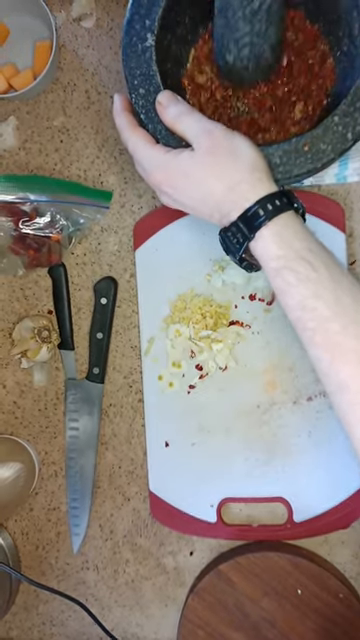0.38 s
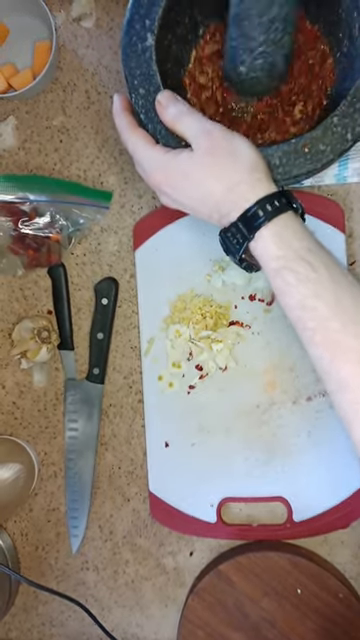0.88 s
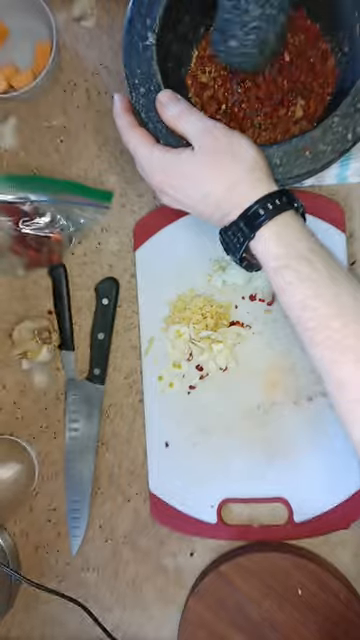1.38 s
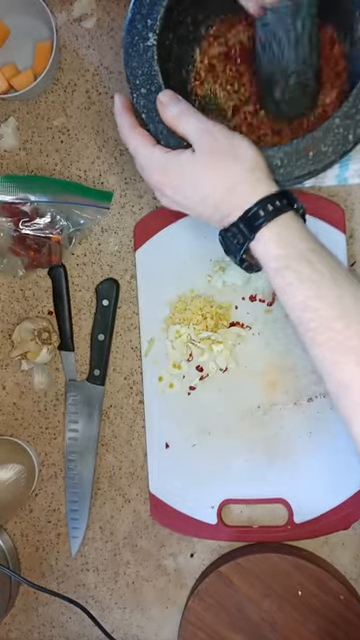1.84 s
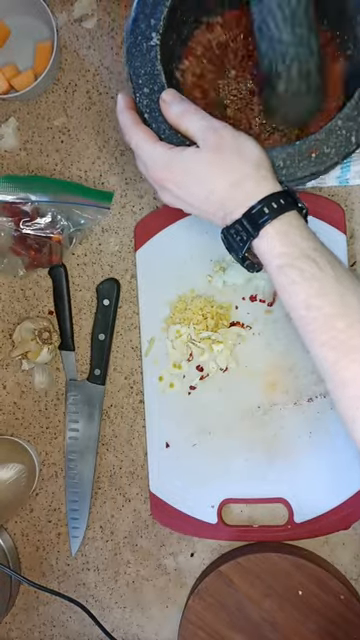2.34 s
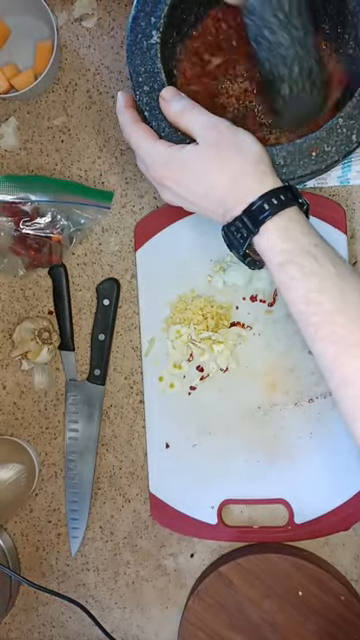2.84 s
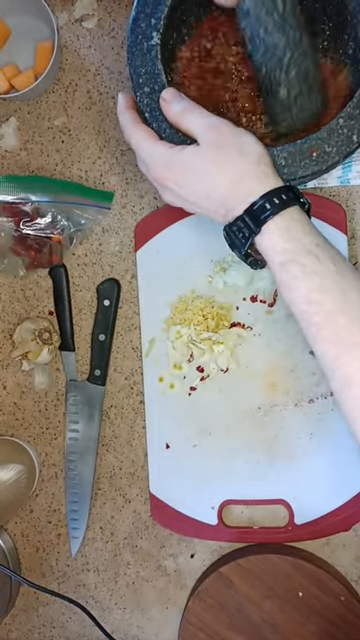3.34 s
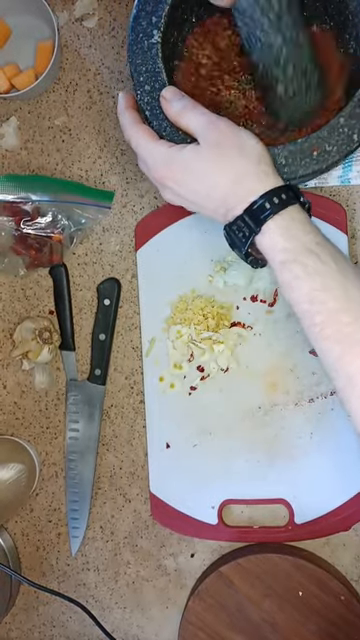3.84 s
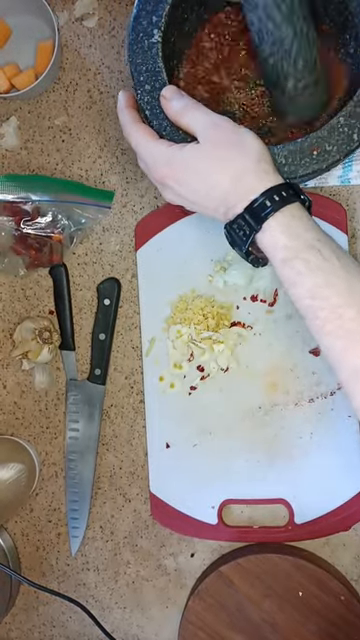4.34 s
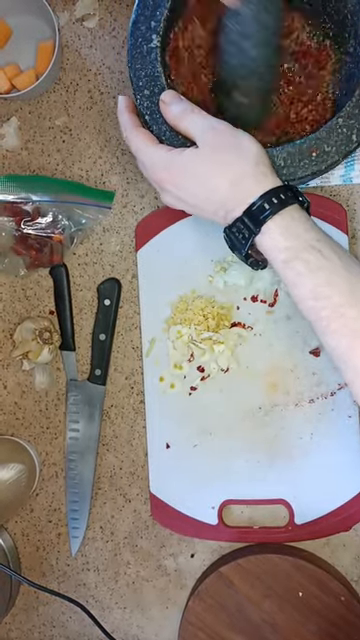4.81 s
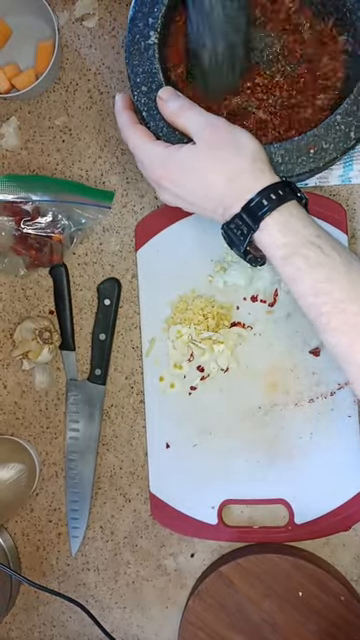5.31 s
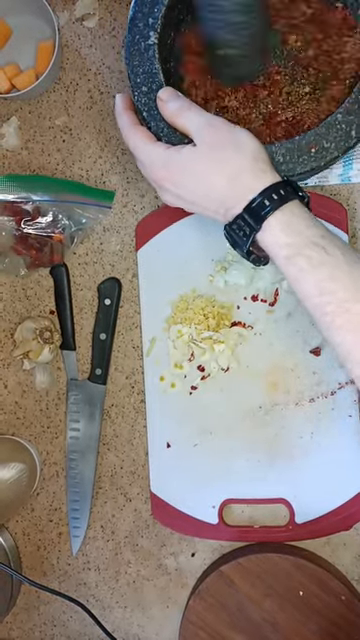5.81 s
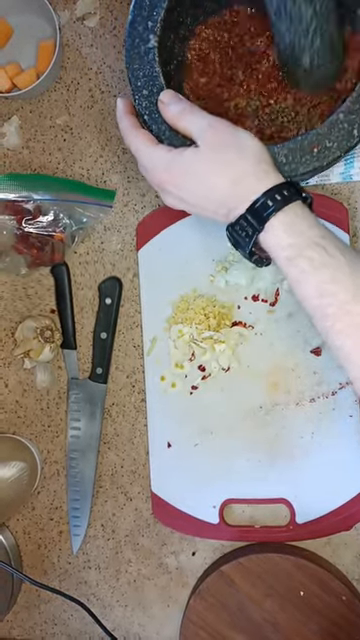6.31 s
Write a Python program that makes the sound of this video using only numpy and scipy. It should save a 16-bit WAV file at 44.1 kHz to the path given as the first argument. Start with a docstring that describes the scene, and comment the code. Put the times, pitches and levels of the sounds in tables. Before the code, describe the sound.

Close by, heavy stone knocks on stone through a layer of brittle spice, eight evenly spaced blows that shake the counter and leave short rough tails. Then the pestle rolls round the bowl, crunching in irregular pushes with dry scrapes, seed pops, light stone ticks and a thin occasional squeak, far softer than the pounding. Small indoor room, quiet hum and hiss.

```python
"""A stone pestle pounds dry spices in a stone mortar: eight quick blows after one still dying away, then it
turns and grinds. Blows are short pushes that ring mortar modes, swing the counter and raise a noise rumble.
Crushed spice is bursts of grit; knocks and rubs excite resonances of the bowl. Grinding is crackle, scrape,
shake and squeak under envelopes of weight and wrist pushes. The kitchen hums quietly under a faint hiss."""
import sys
import numpy as np
from scipy import signal
from scipy.fft import rfft, irfft, next_fast_len
from scipy.io import wavfile
from scipy.ndimage import uniform_filter1d

SR = 44100
rng = np.random.default_rng(int(sys.argv[2]) if len(sys.argv) > 2 else 0)


def natural_amplitude(level_db):
    """Convert a level in decibels to a linear amplitude factor, elementwise."""
    exponent = np.asarray(level_db, float) / 20
    return 10 ** exponent


def inscribe(sig):
    """Save sig as 16-bit PCM at rate SR to the path in sys.argv[1].

    A 1-D sig is mono; a 2-D sig holds one channel per row.
    Samples are clipped to [-1, 1] before scaling.
    """
    pcm = np.round(np.clip(np.atleast_2d(sig).T, -1, 1) * 32767)
    wavfile.write(sys.argv[1], SR, pcm.astype(np.int16))


N = 283563
LEAD = 4410  # samples computed ahead of time 0
STFT = dict(fs=SR, nperseg=512, noverlap=384)


def evened(x):
    """Scales to rms 1."""
    return x / np.sqrt(np.mean(x ** 2) + 1e-20)


def read(points, hz):
    """Reads a table along log frequency."""
    point_hz, value = np.transpose(points)
    return np.interp(np.log(hz + 1), np.log(point_hz + 1), value)


def add(mix, start_s, sound):
    """Mixes a sound into a track that starts LEAD samples early."""
    part = mix[LEAD + round(start_s * SR):][:len(sound)]
    part += sound[:len(part)]


def colour(x, db_at):
    """Filters x by a gain in dB given as a function of frequency; rms 1."""
    size = next_fast_len(len(x))
    gain = natural_amplitude(db_at(np.fft.rfftfreq(size, 1 / SR) + 1))
    return evened(irfft(rfft(x, size) * gain, size)[:len(x)])


def ring(modes, seconds, factor=1):
    """Sum of dying sines, all frequencies scaled by factor."""
    t = np.arange(round(seconds * SR)) / SR
    return sum(natural_amplitude(db - 60 * t / max(t60_s, .005)) * np.sin(2 * np.pi * hz * factor * t)
               for hz, db, t60_s in modes)


def grit(size, share, spread_db):
    """Dense crackle: noise in which a share of samples snap, sizes spread widely."""
    snap = rng.random(size) < share
    sizes = rng.exponential(1, size)
    noise = rng.standard_normal(size)
    return noise * (1 + snap * natural_amplitude(spread_db * np.minimum(sizes, 2.5)))


def smooth_noise(size, span):
    """Noise averaged once over span samples; rms 1."""
    return evened(uniform_filter1d(rng.standard_normal(size), span))


def wander(size, span):
    """Noise averaged twice over span samples, for slow pitch drift; rms 1."""
    return evened(uniform_filter1d(uniform_filter1d(rng.standard_normal(size), span), span))


def slip_noise(size, spread_db, width_hz):
    """Stick-slip modulator: grit low-passed so that it spreads a tone over width_hz; rms 1."""
    return colour(grit(size, .03, spread_db), lambda f: -10 * np.log10(1 + (2 * f / width_hz) ** 4))


# hum colour: freq_hz, gain_db
HUM_COLOUR = [(59, -39), (100, -1), (134, -7.5), (291, 3), (412, -3.5), (490, -17.5), (597, 0.5),
              (788, -10), (896, -15.5), (1310, -5.5), (1600, -21), (2080, -53), (3520, -120)]
HUM_DB, HISS_DB, HISS_DB_PER_OCTAVE = -64, -76.5, -4  # hiss falls above 1.5 kHz


def kitchen():
    """Room hum and faint hiss: two steady coloured noises."""
    hum = colour(rng.standard_normal(N + LEAD), lambda f: read(HUM_COLOUR, f))
    hiss = colour(rng.standard_normal(N + LEAD), lambda f: HISS_DB_PER_OCTAVE * np.log2(np.maximum(f, 1500)))
    return natural_amplitude(HUM_DB) * hum + natural_amplitude(HISS_DB) * hiss


# rumble returned by counter and room: freq_hz, gain_db
RUMBLE_COLOUR = [(62, 1), (105, -7), (203, -4.5), (262, -4), (300, -6), (349, 1), (387, -9.5), (632, 1.5),
                 (1090, -8), (1350, -9), (1520, -12.5), (2750, -25), (6000, -52), (7800, -86),
                 (13200, -120)]
# rumble decay: freq_hz, t60_s
RUMBLE_DECAY = [(150, 0.42), (400, 0.32), (1040, 0.32), (2760, 0.34)]
# resonances standing out of the rumble: freq_hz, width_hz, gain_db
RUMBLE_LINES = [(281, 23, 5), (333, 110, 0), (440, 29, 11.5), (930, 44, 7), (890, 28, 5.5), (1190, 29, -1),
                (1190, 64, 5.5), (1347, 20, 12), (1376, 25, 0)]
RUMBLE_TILT_DB_PER_OCTAVE = .2  # above 200 Hz


def rumble(shared):
    """Gritty tail dying band by band; its bass partly repeats between blows, its upper part is new."""
    hz, t, same = signal.stft(shared, **STFT)
    fresh = signal.stft(evened(grit(len(shared), .012, 4.5)), **STFT)[2]
    alike = np.clip(.75 - hz / 2500, 0, 1)[:, None]
    blend = alike * same + np.sqrt(1 - alike ** 2) * fresh
    fade_db = -60 * np.maximum(t - .04, 0) / read(RUMBLE_DECAY, hz)[:, None]  # holds, then decays
    tail = signal.istft(blend * natural_amplitude(fade_db), **STFT)[1]

    def gain_db(f):
        lines_db = sum(db / (1 + (2 * (f - at_hz) / width_hz) ** 2) for at_hz, width_hz, db in RUMBLE_LINES)
        tilt_db = RUMBLE_TILT_DB_PER_OCTAVE * np.log2(np.maximum(f, 200) / 650)
        return read(RUMBLE_COLOUR, f) + lines_db + tilt_db

    tail = colour(tail, gain_db)
    t = np.arange(len(tail)) / SR
    arrival = np.clip((t - .002) / .015, 0, 1)  # reflections build up
    rocking = natural_amplitude(3 * np.cos(2 * np.pi * 42 * (t - .018)) * np.exp(-t / .1))  # mortar rocks with the counter
    closing = np.clip((t[-1] - t) / .44, 0, 1)
    return tail * arrival * rocking * closing


# blows: start_s, ring_db, shake_db, rumble_db, crush_db (crush is played by cracking)
BLOW_TABLE = [(-.06, -9, -33, -39.5, -40), (.1772, -9.2, -33, -40, -37), (.4142, -9.5, -34.3, -38, -37),
              (.6474, -9, -37.5, -37.5, -41.5), (.8852, -9.4, -37.5, -38.5, -39),
              (1.1134, -15, -32.5, -38, -33.5), (1.3712, -9, -34, -38.5, -35.5),
              (1.6041, -9.1, -35.3, -38.5, -33), (1.8389, -9.4, -32.2, -40.5, -32)]
# mortar modes: freq_hz, level_db, t60_s
MORTAR_MODES = [(436, -10, .026), (619, 0, .048), (678, -4, .024), (927, -22, .04), (1250, -21, .016),
                (1900, -21, .012), (2700, -16, .01)]
# counter and what stands on it, starting one after another: freq_hz, level_db, t60_s, delay_s
COUNTER_MODES = [(16.9, -11, 1, .104), (24.5, 11, 0.25, .048), (41.5, 14, 0.18, 0.0031),
                 (60.8, 2, 0.25, 0.012), (88.4, 0.5, 0.3, 0.0083), (152.6, -3.5, 0.32, 0.0023)]
FULL_RING_DB, FLAT_PER_DB = -9, .008  # a blow cushioned by spice rings weaker and lower
CONTACT_S, SOFTER_S_PER_DB = .00122, .0001  # and the stones stay longer in contact
REBOUND_S, REBOUND_DB = .0425, -17  # mortar lands again on the rocking counter


def pounding():
    """A millisecond push rings the mortar; the counter rocks under it; the room rumbles after."""
    mix = np.zeros(N + LEAD)
    shared = rng.standard_normal(SR // 2)
    for start_s, ring_db, shake_db, rumble_db, _ in BLOW_TABLE:
        cushion_db = FULL_RING_DB - ring_db
        contact = round(SR * (CONTACT_S + SOFTER_S_PER_DB * cushion_db))
        jolt = np.gradient(signal.windows.hann(contact))  # the air feels the change of the force
        knell = np.convolve(ring(MORTAR_MODES, .1, 1 - FLAT_PER_DB * cushion_db), jolt)
        knell = knell / abs(knell).max()
        add(mix, start_s, natural_amplitude(ring_db) * knell)
        add(mix, start_s + REBOUND_S, natural_amplitude(ring_db + REBOUND_DB) * knell)
        for hz, db, t60_s, delay_s in COUNTER_MODES:
            t = np.arange(round(.6 * SR)) / SR
            swell = 1 - np.exp(-t * hz / .6)  # builds up over a cycle
            swing = -swell * ring([(hz, db, t60_s)], .6)  # first swing downward
            add(mix, start_s + delay_s, natural_amplitude(shake_db) * swing)
        add(mix, start_s, natural_amplitude(rumble_db) * rumble(shared))
    return mix


# crushed spice: freq_hz, gain_db
CRUNCH_COLOUR = [(1470, -9.5), (2500, -12.5), (3340, -7), (4200, -6.5), (5180, -4.5), (5760, -4.5),
                 (8130, -2.5), (9930, -8), (13200, -4), (15600, -15)]


def crunch_db_at(hz):
    """Colour of crushed spice, falling away steeply in the bass."""
    return read(CRUNCH_COLOUR, hz) + 12 * np.log2(np.minimum(hz / 1500, 1))


# single seeds and pods bursting: start_s, level_db, t60_s, tilt_db_per_octave
SEED_CRACKS = [(0.705, -23, 0.22, -2.5), (1.2547, -34, 0.055, 14), (1.288, -41, .03, 2),
               (1.529, -33.5, 0.37, -1), (1.584, -41, 0.13, -5), (1.903, -27, 0.13, -6),
               (1.971, -44, .25, -3), (2.7955, -38, .05, 0), (3.0225, -32, .05, 1), (3.062, -40, 0.25, 6),
               (4.008, -36, .03, 14), (4.1767, -37, 0.36, -2), (4.7082, -28, .06, 8), (4.955, -25, 0.11, 4),
               (6.0247, -34, 0.088, -3), (5.47, -32, 0.46, -5)]
# pestle skids on after each blow: start_s, knock_db, knock_hz, scatter_db (knock is played by knocks)
SKID_TABLE = [(0.189, -33.5, 2080, -41.5), (0.4232, -25, 2100, -42), (0.663, -54, 2400, -46.5),
              (0.898, -43, 2500, -45.5), (1.1249, -26.5, 2270, -39), (1.383, -32.5, 2520, -41),
              (1.6148, -33.5, 2260, -42.5), (1.8495, -27.5, 2080, -38.5)]
BURST_DB = -19  # added to every burst level
# spice gives way just before stone meets stone
CRUSH_LEAD_S, CRUSH_SNAP_DB, CRUSH_T60_S, CRUSH_TILT_DB_PER_OCTAVE = .0035, 6, .09, -8
SCATTER_HOLD_S, SCATTER_T60_S, SCATTER_TILT_DB_PER_OCTAVE = .028, .29, .5


def cracking():
    """Crushed, scattering and bursting spice: grit that starts at once, comes in clumps and thins out."""
    mix = np.zeros(N + LEAD)
    t = np.arange(SR // 3) / SR
    crushes = [(start_s - CRUSH_LEAD_S, db + CRUSH_SNAP_DB, CRUSH_T60_S, CRUSH_TILT_DB_PER_OCTAVE, 0)
               for start_s, *_, db in BLOW_TABLE]
    scatters = [(start_s, db, SCATTER_T60_S, SCATTER_TILT_DB_PER_OCTAVE, SCATTER_HOLD_S)
                for start_s, *_, db in SKID_TABLE]
    cracks = [(*row, 0) for row in SEED_CRACKS]
    for start_s, db, t60_s, tilt_db, hold_s in crushes + scatters + cracks:
        burst = colour(grit(len(t), .074, 1.4),
                       lambda f: crunch_db_at(f) + tilt_db * np.log2(np.maximum(f, 2000) / 7000))
        clumps = natural_amplitude(1.4 * smooth_noise(len(t), 250))
        fade_db = -60 * np.maximum(t - hold_s, 0) / max(t60_s, .01)
        attack = np.minimum(t / .00094, 1)
        add(mix, start_s, natural_amplitude(db + BURST_DB + fade_db) * attack * clumps * burst)
    return mix


# pestle on bowl: start_s, peak_db, centre_hz, t60_s, tick_db (sharp tick on top, relative)
KNOCK_TABLE = [(1.26, -43, 2740, 0.055, -18), (1.277, -52, 3140, 0.16, -14), (1.26, -46, 1770, 0.058, -27),
               (2.124, -46, 1060, 0.091, -18), (2.6343, -49, 2470, 0.027, -18),
               (2.774, -47, 1010, 0.13, -22), (3.059, -49, 3150, .04, -20), (3.304, -48, 3300, .06, -20),
               (3.315, -48, 630, 0.048, -26), (3.3575, -42, 2920, 0.021, -22),
               (3.5625, -44.5, 2650, 0.025, -39), (3.997, -35, 2250, 0.013, -32),
               (4.0095, -35, 2260, 0.041, -32), (4.308, -31, 2590, 0.14, -3),
               (4.3113, -34, 1870, 0.17, -13), (4.524, -39, 1790, 0.16, -13.5),
               (4.6186, -48.5, 1730, 0.13, -20), (4.704, -43.5, 3230, 0.26, -14),
               (4.7185, -37, 2470, 0.026, -20), (4.954, -45, 2860, 0.073, -12),
               (5.39, -49, 633, 0.063, -26), (5.721, -39, 3020, 0.039, -5), (6.267, -43, 1600, 0.069, -20),
               (6.3463, -40.5, 2410, 0.12, -2)]
# bowl modes rung by a knock: freq_hz, level_db, t60_s
BOWL_MODES = [(1647, -8, .2), (1938, -6, .1), (2422, -4, .1), (2848, -8, .1), (3989, -2, .07),
              (4592, -3, .15), (5039, -3, .08), (5491, 0, .07), (6837, -3, .08)]
SKID_WIDTH_HZ, SKID_T60_S = 1130, .11
KNOCK_WIDTH = .2  # share of the centre frequency
TICK_HZ, TICK_WIDTH_HZ = 5100, 1200
FIRST_TOUCH, RING_PER_S = 9, .08  # first-contact click; longer contact rings the bowl more


def hump(f, centre_hz, width_hz):
    """Band-pass power response."""
    return 1 / (1 + (2 * (f - centre_hz) / width_hz) ** 4)


def knocks():
    """Each knock excites the bowl modes near its centre, then trails off as a rough scrape."""
    mix = np.zeros(N + LEAD)
    t = np.arange(SR // 3) / SR
    bowl = ring(BOWL_MODES, .2)
    skids = [(start_s, db, hz, SKID_WIDTH_HZ, SKID_T60_S, -np.inf) for start_s, db, hz, _ in SKID_TABLE]
    strikes = [(start_s, db, hz, KNOCK_WIDTH * hz, *rest) for start_s, db, hz, *rest in KNOCK_TABLE]
    for start_s, db, hz, width_hz, t60_s, tick_db in skids + strikes:
        fade = natural_amplitude(-60 * np.maximum(t - .01, 0) / max(t60_s, .01))
        contact = grit(len(t), .005, 6) * fade * (t > .01)  # contact 10 ms in, room for the filter
        contact[SR // 100 + 1] += FIRST_TOUCH
        ringing = signal.oaconvolve(contact, bowl)[:len(t)]
        rung = contact + RING_PER_S * min(t60_s, .15) * ringing
        knock = colour(rung, lambda f: 10 * np.log10(
            hump(f, hz, width_hz) + natural_amplitude(2 * tick_db) * hump(f, TICK_HZ, TICK_WIDTH_HZ)))
        add(mix, start_s - .01, natural_amplitude(db) * knock / abs(knock).max())
    return mix


# stone drags on stone, one bowl resonance each: start_s, length_s (before release), level_db, freq_hz, width_hz
RUB_TABLE = [(1.146, .03, -32, 950, 60), (1.165, .05, -40, 1380, 75), (1.19, .085, -42, 900, 75),
             (1.188, .022, -44, 1730, 100), (2.02, .035, -53, 1500, 250), (2.124, .075, -49, 1190, 80),
             (2.124, .13, -50, 1700, 600), (2.126, .15, -49.5, 2680, 450), (2.126, .09, -54, 6200, 800),
             (2.734, .022, -47, 1760, 70), (2.74, .05, -54, 2750, 300), (2.8, .078, -50, 2200, 600),
             (2.945, .024, -52, 3200, 300), (3.465, .028, -54, 3080, 250), (4.296, .08, -50, 2450, 350),
             (4.305, .018, -45, 3980, 70), (4.306, .025, -46, 5450, 120), (4.315, .05, -55, 4590, 60),
             (4.306, .03, -49, 6650, 300), (4.36, .036, -57, 1650, 80), (4.524, .06, -50, 1980, 300),
             (4.522, .012, -46, 5050, 350), (4.704, .012, -51, 4400, 150), (5.218, .085, -53, 2400, 500),
             (5.495, .085, -54, 2500, 550), (6.025, .085, -52, 1750, 250)]
RUB_RISE_S, RUB_END_S, RUB_FADE_DB, RUB_WANDER_HZ = .003, .008, -5, 14  # fade over the length; wander rms
PURE_HZ = 50  # narrower rubs hold a clear tone, wider ones break into a rasp


def rubs():
    """Slips drive one narrow resonance that wanders a little, starts quickly and stops with the drag."""
    mix = np.zeros(N + LEAD)
    t = np.arange(SR // 5) / SR
    for start_s, length_s, db, hz, width_hz in RUB_TABLE:
        slips = slip_noise(len(t), 3, width_hz)
        pitch_hz = hz + RUB_WANDER_HZ * wander(len(t), 900)
        tone = (min(PURE_HZ / width_hz, 1) + slips) * np.sin(2 * np.pi * np.cumsum(pitch_hz) / SR)
        shape = np.clip(np.minimum(t / RUB_RISE_S, (length_s - t) / RUB_END_S + 1), 0, 1)
        add(mix, start_s, natural_amplitude(db + RUB_FADE_DB * t / length_s) * shape * tone)
    return mix


def drift(x, t, centre_hz, lift_db, octaves, patchy_db):
    """Lifts a band that moves along centre_hz and scatters random patches over time and frequency."""
    hz, frame_s, z = signal.stft(x, **STFT)
    patches = uniform_filter1d(rng.standard_normal(z.T.shape), 16, 0)
    patches = evened(uniform_filter1d(patches, 8, 1)).T
    away = np.log2((hz[:, None] + 1) / np.interp(frame_s + t[0], t, centre_hz)) / octaves
    z = z * natural_amplitude(lift_db * np.exp(-away ** 2) + patchy_db * patches)
    return evened(signal.istft(z, **STFT)[1][:len(x)])


BUILD_UP_DB = 16.5  # climbed over rise_s


def swells(t, peak_s, peak_db, rise_s, fall_db_per_s):
    """Power of each event over time: builds up to its peak, then falls evenly in dB."""
    late_s = t - peak_s[:, None]
    rise_db_per_s = BUILD_UP_DB / np.maximum(np.reshape(rise_s, (-1, 1)), .005)
    slope = np.where(late_s < 0, rise_db_per_s, -fall_db_per_s)
    return natural_amplitude(2 * (peak_db[:, None] + slope * late_s))


# steady weight on the turning pestle: time_s, crunch_db, scrape_pitch_hz
WEIGHT_TABLE = [(1.96, -45, 1820), (2.1, -67, 1320), (2.3, -56, 2510), (2.5, -64, 2200),
                (2.75, -60.5, 1720), (3.0, -61, 2280), (3.3, -65.5, 2100), (3.8, -63.5, 2270),
                (4.1, -65, 2030), (4.5, -70, 1990), (4.95, -60, 2520), (5.3, -60.5, 2200),
                (5.9, -61.5, 1900), (6.43, -67, 1710)]
# pushes of the wrist: peak_s, crunch_db, scrape_db, top_db (crunch above 9.5 kHz, relative), rise_s
PUSH_TABLE = [(2.022, -47, -48.5, -2, 0.018), (2.085, -53, -71, -4, .15), (2.129, -53.5, -58, 1, 0.0087),
              (2.18, -50.5, -62, -6, 0.058), (2.225, -51.5, -50.5, -5, 0.069), (2.41, -52.5, -69, 0, 0.2),
              (2.47, -55.5, -55.5, -2, 0.16), (2.55, -52.5, -73, -6, 0.047), (2.63, -50, -58, -6, 0.059),
              (2.705, -50, -73, -3.5, 0.088), (2.778, -58, -49.5, -4, 0.09), (2.82, -49, -69, 1.5, 0.05),
              (2.86, -51, -65, -1, 0.038), (2.9, -55, -78, -17, 0.065), (2.958, -53, -61.5, -4.5, 0.24),
              (3.07, -47.5, -75, -3, 0.056), (3.192, -50.5, -73, -8.5, 0.052), (3.31, -60, -57, -2, 0.038),
              (3.345, -51.5, -63, 1, 0.049), (3.42, -63, -59, 4, 0.15), (3.473, -52.5, -68, -8, 0.17),
              (3.57, -50, -55.5, -3, 0.032), (3.71, -55, -59.5, -7, 0.094), (3.83, -56, -62, -2, 0.062),
              (3.89, -54.5, -59, -4, 0.042), (4.029, -61, -56, 5, 0.097), (4.2, -65, -69, -11, 0.064),
              (4.306, -44.5, -45.5, -1.5, 0.013), (4.4, -66, -68, -9, .08), (4.47, -55, -66, -6, 0.33),
              (4.525, -53, -57, -3, 0.014), (4.602, -52, -61.5, 0, 0.063), (4.712, -50, -54, -2, 0.042),
              (4.843, -54, -63, -7, 0.045), (4.962, -44.5, -51.5, -1.5, 0.018),
              (5.12, -57.5, -59.5, -9, 0.053), (5.225, -51.5, -51, -7, 0.024), (5.29, -54, -57.5, -7, 0.08),
              (5.483, -55, -54, 6, 0.011), (5.56, -54, -55.5, -4, 0.11), (5.725, -56.5, -59, 3, 0.073),
              (5.757, -63, -70, -5, .02), (5.839, -60, -58.5, 1, 0.065), (6.03, -59, -54, 7, 0.014),
              (6.1, -55, -53, -0.5, 0.11), (6.233, -50, -58.5, -8, 0.074), (6.29, -58.5, -55, 5, 0.059),
              (6.359, -48.5, -53.5, -5.5, 0.018), (6.39, -55, -77, -2, 0.046)]
# mortar lurches on the counter: peak_s, level_db
LURCH_TABLE = [(2.02, -51), (2.14, -50.5), (2.26, -51), (2.43, -53), (2.79, -57), (2.97, -50.5),
               (3.53, -49), (4.03, -61), (4.31, -65), (4.45, -57), (4.7, -61), (4.97, -56), (5.12, -55),
               (5.23, -67), (5.48, -54), (6.06, -47), (6.271, -48), (6.38, -60)]
# pestle sings on a bending mode as it drags: peak_s, level_db
SQUEAK_TABLE = [(2.415, -67), (2.82, -62), (2.21, -58), (2.44, -57.5), (2.65, -63), (2.71, -60),
                (2.956, -61), (3.19, -59.5), (3.448, -53.5), (3.67, -65), (3.711, -55), (3.96, -61.5),
                (4.45, -63.5)]
# stone scrape: freq_hz, gain_db
SCRAPE_COLOUR = [(500, 3), (950, 2), (1250, 5.5), (1700, 1), (2200, 1.5), (2700, 3), (3500, 1), (4800, -1),
                 (8000, -100)]
# counter shake: freq_hz, gain_db
SHAKE_COLOUR = [(12, -27), (20, 5.5), (75, -1.5), (87, -0.5), (113, -22), (140, -24), (180, -9),
                (310, -120)]
CRUNCH_FALL_DB_PER_S, SCRAPE_FALL_DB_PER_S = 233, 196
STEADY_SCRAPE_DB, STEADY_TOP_DB = -4.5, -3.5  # scrape relative to the steady crunch
CRUNCH_HZ, CRUNCH_HZ_PER_DB = 7210, 160  # brighter pushes crunch higher
LURCH_RISE_S, LURCH_FALL_DB_PER_S, TREMBLE_DB = .026, 128, -61
SQUEAK_HZ, SQUEAK_RISE_S, SQUEAK_FALL_DB_PER_S = 3576, .032, 402
SQUEAK_WIDTH_HZ, SQUEAK_WANDER_HZ = 200, 50  # wander rms


def grinding():
    """Crunch and scrape follow weight and pushes; the mortar lurches; the pestle squeaks."""
    weight_s, weight_db, pitch_hz = np.transpose(WEIGHT_TABLE)
    start_s = weight_s[0]
    t = np.arange(start_s, N / SR, 1 / SR)
    coarse_s = np.arange(start_s, N / SR + 1, 1 / 500)  # envelope grid
    size = len(t)

    def gain(power):
        return np.interp(t, coarse_s, np.sqrt(power))

    steady = natural_amplitude(2 * np.interp(coarse_s, weight_s, weight_db))
    push_s, crunch_db, scrape_db, push_top_db, rise_s = np.transpose(PUSH_TABLE)
    pushes = swells(coarse_s, push_s, crunch_db, rise_s, CRUNCH_FALL_DB_PER_S)
    crunch_power = steady + pushes.sum(0)
    mean_top_db = (push_top_db @ pushes + STEADY_TOP_DB * steady) / crunch_power
    top_db = np.interp(t, coarse_s, mean_top_db)
    scrapes = swells(coarse_s, push_s, scrape_db, rise_s, SCRAPE_FALL_DB_PER_S)
    scrape_power = steady * natural_amplitude(2 * STEADY_SCRAPE_DB) + scrapes.sum(0)
    lurches = swells(coarse_s, *np.transpose(LURCH_TABLE), LURCH_RISE_S, LURCH_FALL_DB_PER_S)
    shake_power = natural_amplitude(2 * TREMBLE_DB) + lurches.sum(0)
    squeaks = swells(coarse_s, *np.transpose(SQUEAK_TABLE), SQUEAK_RISE_S, SQUEAK_FALL_DB_PER_S)

    crunch_hz = CRUNCH_HZ + CRUNCH_HZ_PER_DB * top_db
    seeds = drift(grit(size, .06, 2.6), t, crunch_hz, lift_db=3.5, octaves=.39, patchy_db=2.5)
    dull = colour(seeds, lambda f: crunch_db_at(f) - 40 * (f > 9500))
    bright = colour(seeds, lambda f: crunch_db_at(f) - 40 * (f <= 9500))
    crunch = .96 * dull + .78 * natural_amplitude(top_db) * bright
    flutter = evened(natural_amplitude(1.57 * smooth_noise(size, 600)))  # seeds give way in clumps

    scrape_hz = np.interp(t, weight_s, pitch_hz)
    stone = drift(grit(size, .03, 3.8), t, scrape_hz, lift_db=1.5, octaves=.3, patchy_db=1.7)
    scrape = colour(stone, lambda f: read(SCRAPE_COLOUR, f))
    shake = colour(rng.standard_normal(size), lambda f: read(SHAKE_COLOUR, f))

    waver = slip_noise(size, 2.5, SQUEAK_WIDTH_HZ)
    squeak_hz = SQUEAK_HZ + SQUEAK_WANDER_HZ * wander(size, 1500)
    squeak = 2 * evened(waver + .7) * np.sin(2 * np.pi * np.cumsum(squeak_hz) / SR)

    stones = gain(crunch_power) * crunch + gain(scrape_power) * scrape + gain(squeaks.sum(0)) * squeak
    sound = flutter * stones + gain(shake_power) * shake
    return start_s, sound * np.minimum((t - start_s) / .096, 1)


def scene():
    """All sources at the microphone."""
    mix = kitchen() + pounding() + cracking() + knocks() + rubs()
    add(mix, *grinding())
    return mix[None, LEAD:]


def roll_off(x):
    """The treble ends steeply here."""
    return signal.sosfilt(signal.butter(12, 16320, fs=SR, output="sos"), x)


def record(dry):
    """The phone's band limit: linear-phase low-pass at 15.75 kHz."""
    lowpass = signal.firwin(401, 15750, window=("kaiser", 9), fs=SR)
    mix = signal.oaconvolve(dry, lowpass[None], "same")
    return roll_off(mix)


dry = scene()
out = record(dry)
inscribe(out)
```